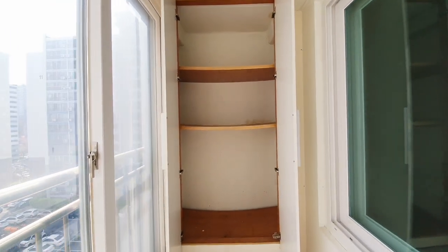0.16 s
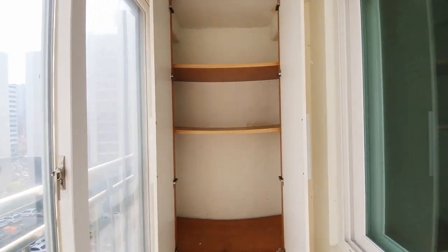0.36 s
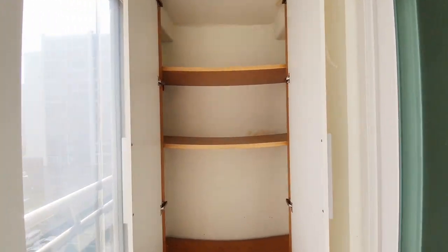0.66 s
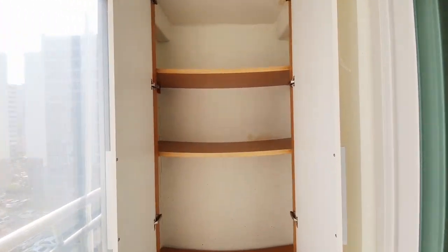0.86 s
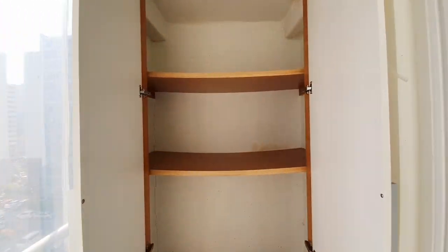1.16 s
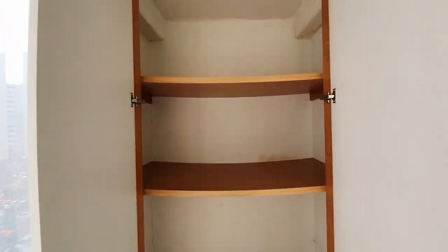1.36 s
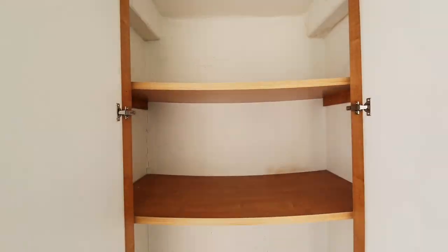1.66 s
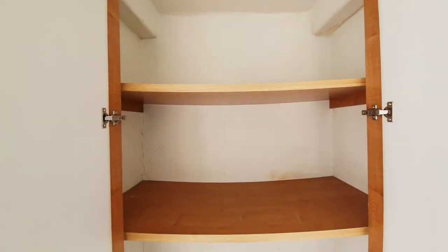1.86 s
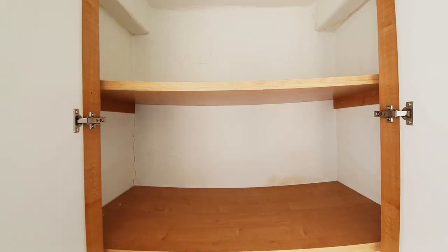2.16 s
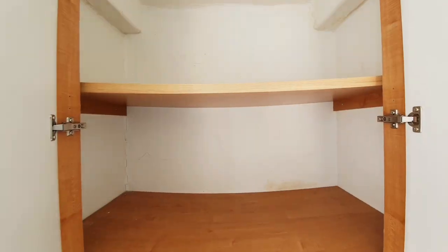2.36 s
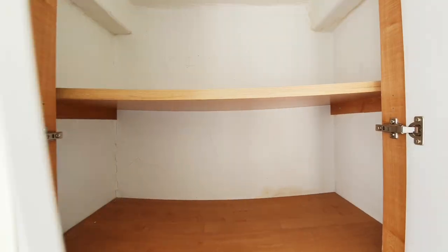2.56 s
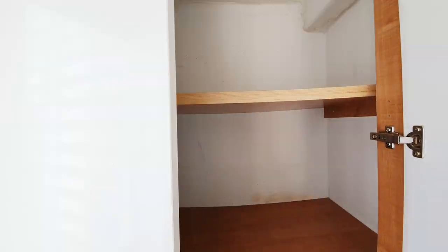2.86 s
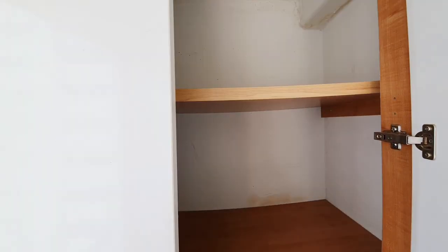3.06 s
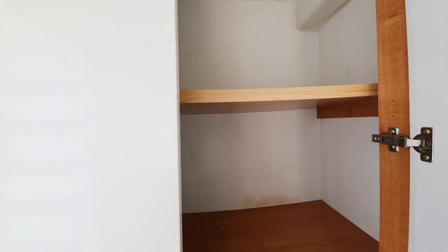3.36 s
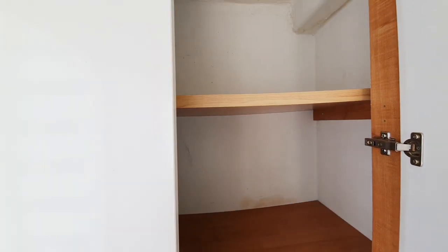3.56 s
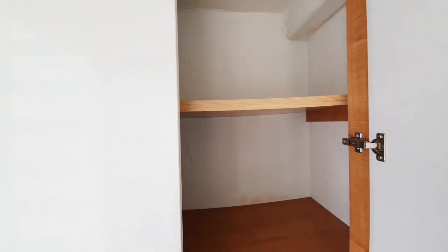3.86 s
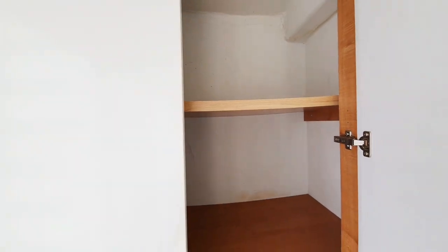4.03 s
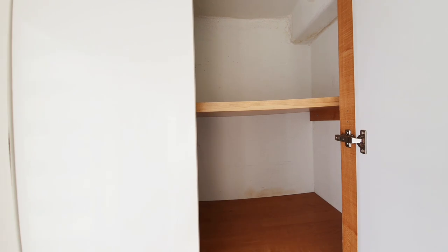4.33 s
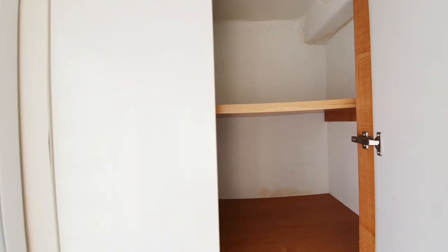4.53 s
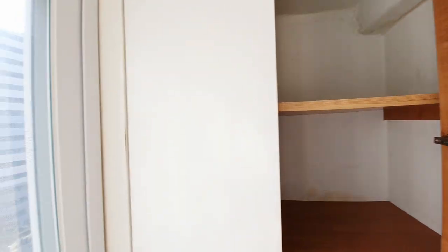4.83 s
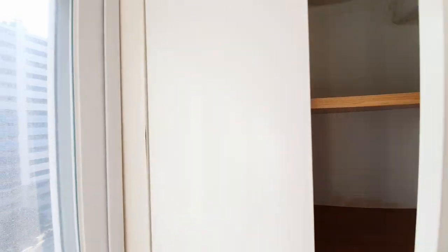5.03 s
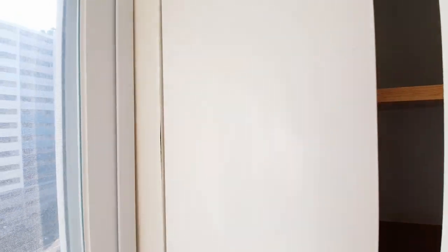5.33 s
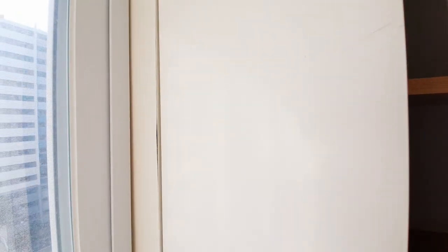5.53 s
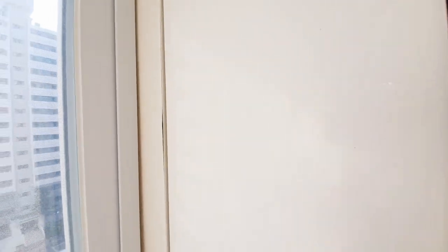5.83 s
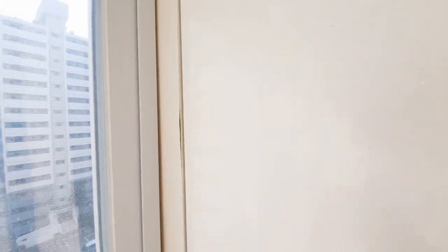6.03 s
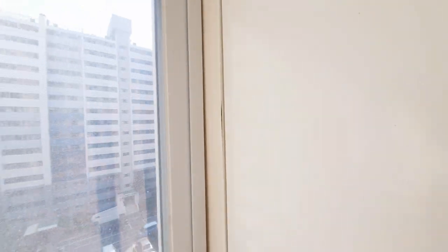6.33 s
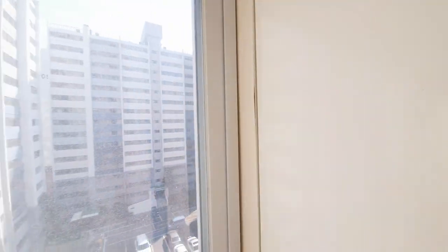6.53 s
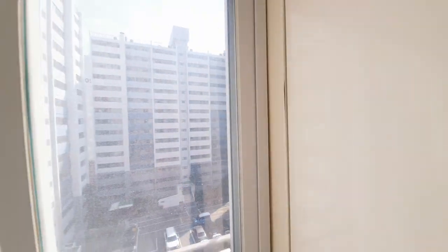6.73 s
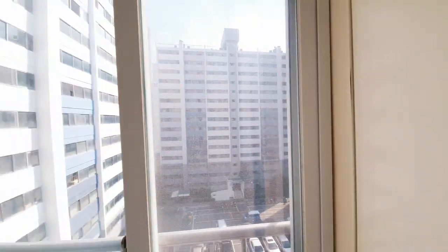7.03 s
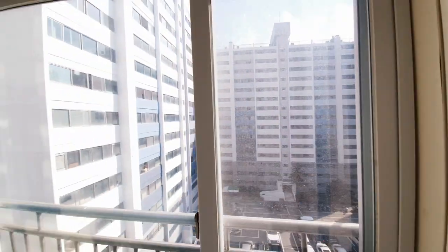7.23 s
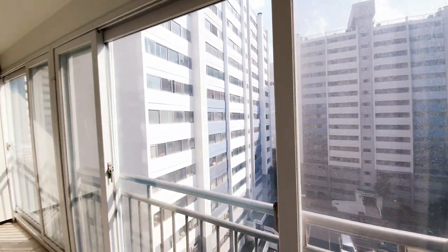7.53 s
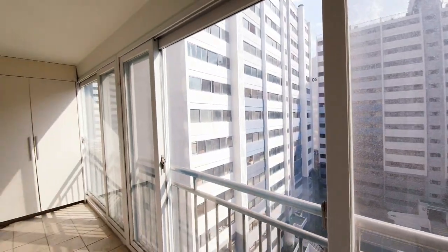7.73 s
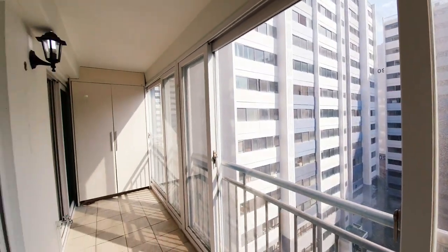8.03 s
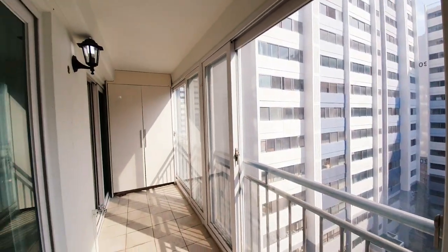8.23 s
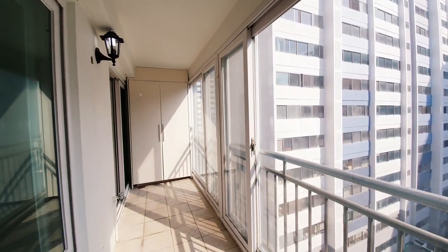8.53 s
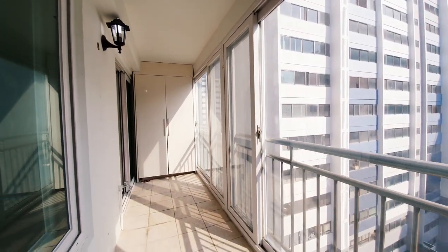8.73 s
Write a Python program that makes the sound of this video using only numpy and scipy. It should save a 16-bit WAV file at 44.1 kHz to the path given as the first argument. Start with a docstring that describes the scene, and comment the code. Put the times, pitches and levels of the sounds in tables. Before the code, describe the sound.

Cabinet doors knock and thump in an empty, reverberant space. Light woody taps come first, then a metallic hinge click and a low groan of the door panel, then a heavy slam with a punchy low end and a crisp latch crack. Another low thump, a hard clear knock and small footfalls follow, with soft cloth strokes between. The microphone is hand-held and close, picking up handling rumble; distant city noise is very quiet.

```python
"""In a bare, echoing apartment, cabinet doors and footsteps knock and thump close to a hand-held camera.
Blows are noise shaped by door and wall modes, dying band by band; wavering sines add short tones.
Hinges tick in short cracks, a jacket rustles in strokes of grainy noise, the door leaf groans in the grip.
The hand rumbles on the camera in low lumps, and the city hums far below as dark, slowly wavering noise."""
import sys
import numpy as np
from scipy import signal
from scipy.fft import rfft, irfft, next_fast_len
from scipy.io import wavfile
from scipy.ndimage import uniform_filter1d, map_coordinates

SR = 44100
rng = np.random.default_rng(int(sys.argv[2]) if len(sys.argv) > 2 else 0)


def generate_wav(signal):
    """Clip the signal to [-1, 1] and save it as 16-bit WAV at the path in sys.argv[1]."""
    frames = np.transpose(np.atleast_2d(signal))
    scaled = np.clip(frames, -1, 1) * 32767
    pcm = np.round(scaled).astype(np.int16)
    wavfile.write(sys.argv[1], SR, pcm)


N = 392049  # length in samples

# blows of doors and feet, levels relative: t/s, knock 350-1200 Hz level/dB, boom under 90 Hz level/dB,
# body 90-350 Hz level/dB, snap 1.2-3.5 kHz level/dB, multiple of the room's ring time
BLOWS = [(0.204, -55, -80, -38, -95, 0.46), (1.195, -35.5, -100, -40.5, -60.5, 0.8),
         (1.318, -47.5, -80, -54.5, -84, 1.27), (2.613, -44, -64, -90, -50.5, 1.03),
         (2.64, -43.5, -37, -44, -45.5, 0.7), (2.95, -53, -69.5, -60, -58, 1.4),
         (3.015, -33.5, -72, -50, -55.5, 0.78), (3.105, -36, -70, -36.5, -77, 0.25),
         (3.126, -42, -61, -49, -63, 0.95), (3.231, -68, -31, -35, -80, 0.34),
         (3.263, -23.5, -27.5, -20, -29, 0.51), (3.276, -29, -27.5, -19.5, -48, 0.96),
         (3.905, -52, -100, -44.5, -74, 0.7), (4.029, -41, -29, -31.5, -50.5, 0.74),
         (4.367, -57.5, -36, -45.5, -67, 1.64), (5.055, -29.5, -29, -21.5, -48, 0.72),
         (5.107, -36, -28, -25, -76, 0.65), (5.166, -55, -35, -35, -80, 0.92),
         (5.623, -43, -49, -41.5, -57.5, 0.38), (5.733, -46.5, -71, -38.5, -88, 0.66),
         (6.094, -21.5, -29, -26, -28.5, 1.04), (6.429, -41, -36, -46, -57, 0.93),
         (6.636, -33.5, -40.5, -32, -46.5, 0.82), (7.952, -67, -36, -49, -86, 0.4),
         (8.08, -44.5, -31, -35.5, -56.5, 0.46), (8.124, -44, -41.5, -28.5, -84, 0.46),
         (8.157, -47, -41, -30, -90, 0.58)]
# modes of doors and walls, before a random change per blow: f/Hz, relative level over the noise/dB
PANEL_MODES = [(62, 1.5), (88, 5), (110, 6.5), (144, 3), (190, -11), (258, 5), (295, 6), (366, 2),
               (447, -6), (577, 6), (630, 1.5), (705, -4), (741, -1.5), (893, -9.5), (1120, 4),
               (1206, -2.5), (1330, -10.5), (1406, -5.5), (1700, -1), (1950, -6)]
# ring time of the room, before each blow's multiple: f/Hz, t60/s
ROOM_RING = [(40, 0.72), (120, 0.95), (300, 0.87), (700, 0.71), (1500, 0.53), (4000, 0.23), (12000, 0.05)]
# build-up time constant of a blow at 150 Hz, and its growth per dB that the snap lies away from -39 dB
SWELL_S, SWELL_S_PER_DB = 0.00925, 0.0000925

# short tones: panels and fittings ringing, a rubbing squeak near 1.9 s, a low bump at 1.562 s,
# the slam's low punch: t/s, f/Hz, relative level/dB, t60/s
NOTES = [(.21, 291.6, -62, 1.3), (.611, 283.5, -66.5, 3.4), (1.195, 640, -42, 0.058),
         (1.194, 450, -38, 0.084), (1.22, 510, -47, 0.18), (1.271, 415, -31.5, 0.036),
         (1.285, 259, -34.5, 0.062), (1.562, 45.6, -36, 0.31), (1.315, 310, -46.5, 0.39),
         (1.2, 235, -44, 0.14), (1.42, 780, -60, 0.14), (1.901, 1750, -65, .3), (1.925, 1420, -67, .2),
         (1.942, 1740, -57.5, 0.21), (1.984, 1850, -64, .15), (3.106, 320, -36, 0.041),
         (3.016, 520, -40, 0.067), (3.02, 900, -47, .12), (3.3008, 7700, -32.5, 0.017),
         (3.279, 255, -27, .15), (3.265, 2090, -41, 0.05), (3.2785, 105, -5.5, 0.071),
         (3.272, 112.6, -32, 0.91), (3.289, 142.7, -26.5, 0.63), (3.291, 255, -38, 0.67),
         (3.7, 66, -45, 0.91), (4.035, 627, -51.5, 0.36), (4.27, 567, -56.5, 0.32), (4.29, 750, -59, 0.33),
         (5.062, 61.1, -26, 1.14), (5.09, 118, -26.5, 0.53), (5.09, 260.5, -35, 0.73),
         (5.08, 673, -49, 0.25), (5.17, 542, -49, 0.26), (8.125, 349.4, -42, 0.31), (8.13, 250, -38, .35),
         (8.082, 95.3, -29.5, 0.18), (8.128, 544, -48, 0.26), (3.126, 310, -28.5, 0.044),
         (5.2, 224.8, -45, 1.26), (5.74, 290, -57.5, 0.67), (5.06, 407, -38, 0.31), (6.094, 677, -37, 0.45),
         (6.1, 1111, -48, 0.33), (6.1, 1406, -44, .25), (6.1, 1695, -48, 0.19), (6.43, 640, -50, 0.16),
         (7.1, 1700, -60, 0.051), (6.636, 1100, -43.5, 0.055), (6.636, 500, -39.5, 0.08),
         (6.094, 1180, -24.5, 0.042), (6.094, 1820, -24, 0.028), (6.11, 149, -30.5, 0.7),
         (6.12, 85, -35, 0.94)]
SWELL_CYCLES = 2.37  # time constant of a note's build-up, in its own cycles
# soft low thuds: t/s, relative level/dB
BUMPS = [(2.929, -33), (3.026, -35), (3.789, -33.5), (4.717, -26.5)]
BUMP_HZ, BUMP_T60_S, BUMP_PAN_DB = 47, 0.16, -20  # left minus right, so louder on the right
# groans of the gripped door leaf: t/s, relative level/dB
GROANS = [(1.99, -46), (2.04, -51), (2.085, -50), (2.119, -37.5), (2.209, -45), (2.305, -54)]
# modes of the door leaf: f/Hz, level over the groan/dB, t60/s
LEAF_MODES = [(214, 0.5, 0.16), (300, -9, 0.11), (435, -22, 0.12), (684, -19, 0.065)]

# hinge and latch ticks: t/s, relative level/dB, centre f/Hz, t60/s, left minus right level/dB, width/octaves
TICKS = [(0.193, -58.5, 7510, 0.98, 0, 1), (0.8628, -41, 2650, 0.4, 0, 0.59),
         (2.1816, -29.5, 3080, 0.25, 2.5, 0.69), (2.486, -46, 2400, 0.32, 2, 0.6),
         (2.64, -42, 4100, 0.1, -4, 0.29), (2.768, -43, 4140, 0.38, 0, 1),
         (3.02, -47, 6140, 0.083, 5, 0.35), (3.287, -18.5, 14050, 0.15, -1, 0.28),
         (3.301, -27, 6600, 0.028, -2, 0.63), (3.31, -38.5, 7800, 0.35, 2, .3),
         (8.128, -52, 1900, .1, 0, .35), (4.03, -52, 4000, 0.33, 0, 0.16),
         (3.472, -39.5, 12600, 0.26, -7, 0.15), (5.0613, -38, 2460, 0.45, -1, 0.64),
         (5.628, -40.5, 11430, 0.29, -2, 0.91), (5.689, -38.5, 5700, 0.35, 1.5, 0.63),
         (8.182, -57, 3850, 0.13, 4, 1)]
# modes of the steel hinge, before a random change per tick: f/Hz, relative level/dB, t60/s
HINGE_MODES = [(1985, 6, 0.096), (3570, -5.5, 0.14), (5240, -14.5, 0.08)]

# colour of rubbing cloth: f/Hz, relative level per Hz/dB
CLOTH_COLOUR = [(290, -16), (500, -4.5), (1000, -4.5), (2000, -3.5), (6000, -6), (9000, -9), (12700, 4),
                (15800, -1)]
# strokes of cloth: peak t/s, level/dB, rise/s, fall/s, crispness (treble over the rest) level/dB
STROKES = [(.22, -69.5, 0.076, 0.21, 4), (.59, -63.5, 0.47, 0.53, -6), (.89, -56.5, 0.062, 0.16, -25),
           (1.41, -63, 0.57, 0.2, -4), (1.52, -67, 0.13, 0.18, 3), (1.96, -61, 0.074, 0.11, -0.5),
           (2.13, -58.5, 0.082, 0.18, 6.5), (2.198, -45, 0.041, 0.12, -7), (2.5, -64.5, 0.94, 0.15, -7),
           (2.65, -55, 0.15, 0.18, -8.5), (2.771, -54, 0.023, 0.082, 3.5),
           (3.042, -51.5, 0.065, 0.16, -2.5), (3.3, -46, 0.083, 0.13, -4.5), (3.49, -62, 0.084, 0.08, 3.5),
           (3.69, -65.5, 0.18, 0.47, -4.5), (4.09, -61, 0.17, 0.076, -1.5), (4.26, -55.5, 0.16, 0.28, -2.5),
           (4.44, -56.5, 0.14, 0.085, -1.5), (5.07, -62, 0.12, 0.2, -11), (5.3, -68.5, 0.53, 0.55, 1),
           (5.668, -46, 0.055, 0.074, 2.5), (5.76, -62.5, .05, 0.18, -7), (5.919, -49.5, 0.081, 0.19, 1),
           (6.011, -46, 0.14, 0.11, -3), (6.358, -52, 0.18, 0.29, -5.5), (6.86, -50, 0.19, 0.32, -4.5),
           (7.021, -53, 0.2, 0.097, -1.5), (8.369, -44.5, 0.13, 0.19, -4.5), (8.74, -48.5, 0.13, 0.23, -3)]
# loss one rise or fall time away from the peak; roundness of the top; level between strokes
STROKE_DROP_DB, STROKE_ROUND, CLOTH_REST_DB = 20, 1.276, -78

# how hard the hand works on the camera body: t/s, level/dB
HANDLING = [(0.0, -67.5), (1.4, -64), (1.65, -62), (2.2, -65.5), (2.6, -61.5), (3.2, -55.5), (3.39, -41),
            (3.54, -68), (4.04, -56), (4.23, -45), (4.75, -51), (5.22, -57.5), (5.47, -55.5), (5.84, -90),
            (6.12, -45), (6.29, -43), (6.56, -64), (7.3, -60.5), (8.07, -58), (8.3, -49.5), (8.62, -60.5),
            (8.89, -75)]
# colour of the far city: f/Hz, relative level per Hz/dB
CITY_COLOUR = [(15, -2.5), (40, -2.5), (70, -4), (158, -10.5), (330, -12.5), (600, -20), (1500, -28.5),
               (3440, -37), (8000, -55.5), (15800, -29.5)]
CITY_DB = -63.5

# stereo width, before each source's own offset: f/Hz, side minus middle level/dB
WIDTH = [(60, -14), (110, -13), (200, -12), (380, -8), (700, -2), (1290, 5), (2380, 0), (4400, 1),
         (8120, -1), (15000, 0)]
# response of the microphone in its housing: f/Hz, level/dB
MIC_RESPONSE = [(7000, 1.5), (8000, 3.5), (9200, -5), (11000, -7.5), (12200, -8)]
TOP_HZ = 15790  # band limit


def amp(db):
    """Decibels to a linear gain."""
    return 10 ** (np.asarray(db) / 20)


def unit(x):
    """Scale to an rms of 1."""
    return x / np.sqrt(np.mean(x ** 2) + 1e-20)


def along(points, hz):
    """Read (Hz, value) points on a log frequency axis."""
    f, value = np.transpose(points)
    return np.interp(np.log(hz + 1), np.log(f + 1), value)


def wobble(rate):
    """A smooth random curve with rate knots a second."""
    knots = rng.standard_normal(int(N * rate / SR) + 4)
    return map_coordinates(knots, [np.arange(N) * rate / SR])


def filtered(x, response):
    """Shape x by a gain that depends on frequency."""
    size = next_fast_len(x.shape[-1] + 8192)
    spectrum = rfft(x, size) * response(np.fft.rfftfreq(size, 1 / SR))
    return irfft(spectrum, size)[..., :x.shape[-1]]


def ports(pair, wide_db):
    """Two unrelated sounds become middle and side of the microphone pair."""
    middle = pair[0]
    side = filtered(pair[1], lambda hz: amp(along(WIDTH, hz) + wide_db))
    return np.array([middle + side, middle - side])


def rush(colour, patchy_db):
    """Two coloured noises, rms 1 together, sharing patches of random gain in time and frequency."""
    grid = signal.stft(rng.standard_normal((2, N)), nperseg=512)[2]
    patches = uniform_filter1d(rng.standard_normal(grid.shape[1:]), size=6, axis=0)
    patches = uniform_filter1d(patches, size=8, axis=1)
    pair = signal.istft(grid * amp(patchy_db * unit(patches)), nperseg=512)[1][:, :N]
    return unit(filtered(pair, lambda hz: amp(along(colour, hz))))


def blows():
    """Each blow rings the modes and fills the room with noise that swells, then dies band by band."""
    size = 2 ** 15
    t, hz = np.arange(size) / SR, np.fft.rfftfreq(size, 1 / SR)
    # overlapping triangular bands, two thirds of an octave apart
    centres = 30 * 2. ** (np.arange(14) * 2 / 3)
    bands = np.clip(1 - 1.5 * abs(np.log2((hz + 1) / centres[:, None])), 0, 1)
    room_t60 = along(ROOM_RING, centres)[:, None]
    mode_hz, mode_db = np.transpose(PANEL_MODES)
    mode_width = 3 + 0.013 * mode_hz[:, None]
    strips = 1 / (1 + ((hz - mode_hz[:, None]) / mode_width) ** 2)
    out = np.zeros((2, N + size))
    for s, knock_db, boom_db, body_db, snap_db, share in BLOWS:
        colour = [(12, boom_db + 0.5), (55, boom_db - 9), (180, body_db - 15.5),
                  (450, knock_db - 26), (780, knock_db - 30), (1200, (knock_db + snap_db) / 2 - 27),
                  (2000, snap_db - 25.5), (3300, snap_db - 38), (16000, snap_db - 69)]
        spectrum = rfft(rng.standard_normal((2, size))) * amp(along(colour, hz) + 24.5)
        # each mode lifts a narrow strip of the noise, at a new strength for every blow
        strength = amp(mode_db - 0.5 + rng.normal(0, 4.14, len(mode_db)))
        spectrum = spectrum * (1 + strength @ strips)
        # a random wobble of gain makes each band die unevenly
        knots = rng.standard_normal((14, 40))
        unevenness = amp(1.8 * np.array([np.interp(t * 40, np.arange(40), row) for row in knots]))
        ring = amp(-60 * t / (share * room_t60))
        # the strike itself stands above the ring for a few cycles
        strike = 0.59 * amp(-60 * t / (0.028 + 25 / centres[:, None]))
        # low bands need longer to build up
        swell = SWELL_S + SWELL_S_PER_DB * abs(snap_db + 39)
        rise = 1 - np.exp(-t / (swell * 150 / centres[:, None] + 0.00018))
        banded = irfft(spectrum[:, None] * bands)
        start = round(s * SR)
        out[:, start:start + size] += (banded * (ring + strike) * rise * unevenness).sum(axis=1)
    return ports(out[:, :N], wide_db=-0.5)


def notes(rows):
    """A tone builds up and dies; its level and phase waver at random."""
    t, out = np.arange(SR) / SR, np.zeros((2, N + SR))  # a note lasts one second at most
    for s, hz, db, t60 in rows:
        knots = rng.standard_normal((3, 60))
        knot_rate = np.clip(hz / 20, 8, 55)
        waver, drift, apart = (map_coordinates(row, [t * knot_rate]) for row in knots)
        # middle and side wander apart in phase
        phase = 2 * np.pi * hz * t + drift - drift[0] + np.array([0 * t, 2.14 + apart])
        rise = 1 - np.exp(-t * hz / SWELL_CYCLES)
        start = round(s * SR)
        out[:, start:start + SR] += amp(db - 60 * t / t60 + 3 * waver) * rise * np.sin(phase)
    return ports(out[:, :N], wide_db=-4)


def bumps():
    """Soft thuds are one low mode, dying fast and leaning to the right."""
    pan = amp(np.array([[BUMP_PAN_DB], [-BUMP_PAN_DB]]) / 2)
    return pan * notes([(s, BUMP_HZ, db, BUMP_T60_S) for s, db in BUMPS])


def groans():
    """The door leaf hums on its own modes as it is gripped."""
    return notes([(s, hz, db + level, t60) for s, db in GROANS for hz, level, t60 in LEAF_MODES])


def ticks():
    """A short crack of metal, a faint ring of the hinge and a hissy answer of the walls."""
    t = np.arange(SR // 3) / SR
    out = np.zeros((2, N + len(t)))
    for s, db, centre_hz, t60, pan_db, octaves in TICKS:
        crack, answer = amp(-60 * t / 0.0016), 0.65 * amp(-60 * t / t60)
        puff = rng.standard_normal((2, len(t))) * (crack + answer)
        ring = np.zeros((2, len(t)))
        for hz, level, ring_t60 in HINGE_MODES:
            mode_db = level + rng.normal(0, 4.1, (2, 1))
            ring += amp(mode_db - 60 * t / ring_t60) * np.sin(2 * np.pi * hz * t)
        click = filtered(2 * puff + amp(-13) * ring,
                         lambda hz: 1 / (1 + (np.log2((hz + 1) / centre_hz) / octaves) ** 4))
        pan = np.array([[pan_db], [-pan_db]]) / 2
        start = round(s * SR)
        out[:, start:start + len(t)] += amp(db - 7.5 + pan) * click
    return out[:, :N]


def jacket():
    """Synthetic cloth slides on itself: dense tiny grains, crisper in some strokes."""
    t = np.arange(N) / SR
    power = np.full((2, N), amp(CLOTH_REST_DB) ** 2)  # rows: the rest, the treble
    for s, db, rise, fall, crisp_db in STROKES:
        away = np.where(t < s, (s - t) / rise, (t - s) / fall)
        stroke_db = db - STROKE_DROP_DB * away ** STROKE_ROUND
        power += amp(stroke_db + np.array([[0], [crisp_db]])) ** 2
    grain = unit(amp(0.36 * wobble(300) + 1.23 * wobble(40)))
    cloth = ports(rush(CLOTH_COLOUR, patchy_db=1.5), wide_db=-0.5) * grain
    treble = filtered(cloth, lambda hz: 1 / (1 + (9500 / (hz + 1)) ** 12))
    return np.sqrt(power[0]) * (cloth - treble) + np.sqrt(power[1]) * treble


def handling():
    """The hand shifts on the camera body in low lumps."""
    s, db = np.transpose(HANDLING)
    level_db = np.interp(np.arange(N) / SR, s, db)
    colour = [(8, -8.5), (25, -3.5), (60, -8.5), (150, -24.5), (300, -94)]
    lumps = amp(3 * wobble(9)) * rush(colour, patchy_db=-3.5)
    return amp(level_db) * ports(unit(lumps), wide_db=2.5)


def city():
    """The city far below is a wide, dark noise whose level wavers slowly."""
    hum = ports(rush(CITY_COLOUR, patchy_db=1.5), wide_db=1.5)
    return amp(CITY_DB + 0.5 * wobble(2.5)) * hum


def scene():
    """Doors and feet in front, then hinges, cloth and hand, with the city behind."""
    struck = blows() + notes(NOTES) + bumps() + groans()
    return struck + ticks() + jacket() + handling() + city()


def record(dry):
    """The microphone housing lifts 8 kHz and dulls what lies above; nothing passes the band limit."""
    return filtered(dry, lambda hz: amp(along(MIC_RESPONSE, hz)) * (hz < TOP_HZ))


dry = scene()
out = record(dry)
generate_wav(out)
```